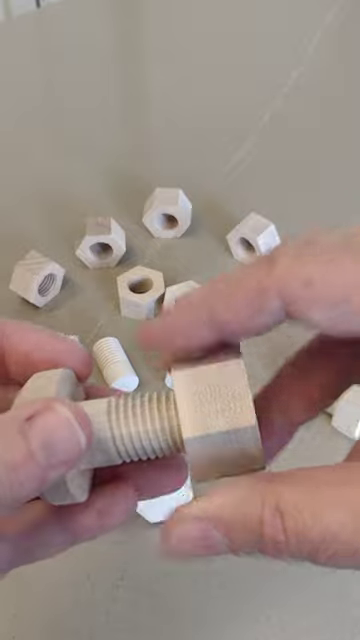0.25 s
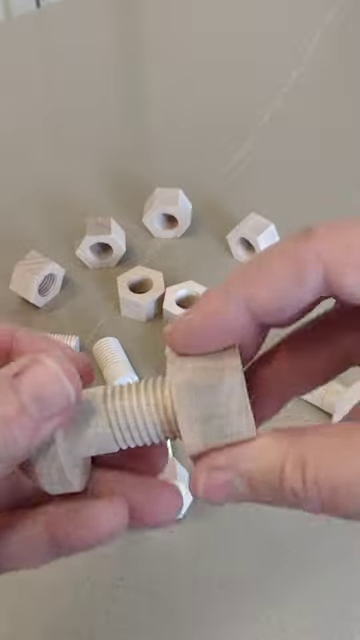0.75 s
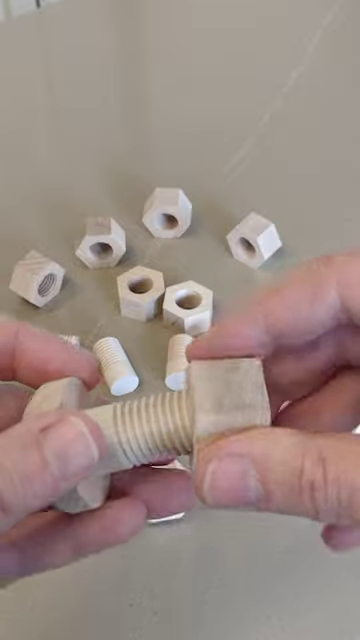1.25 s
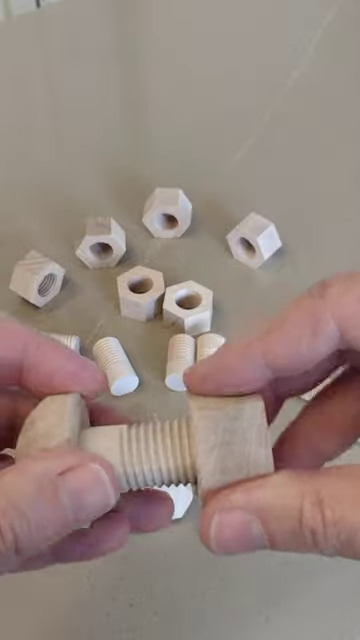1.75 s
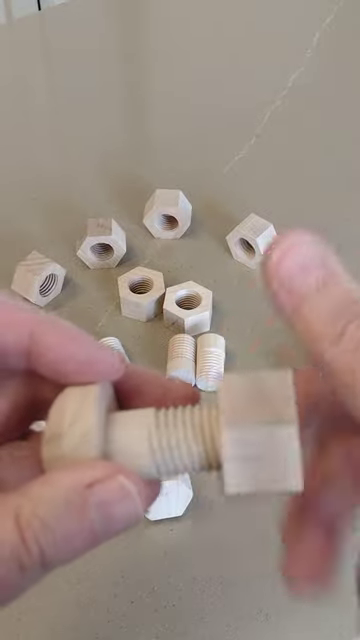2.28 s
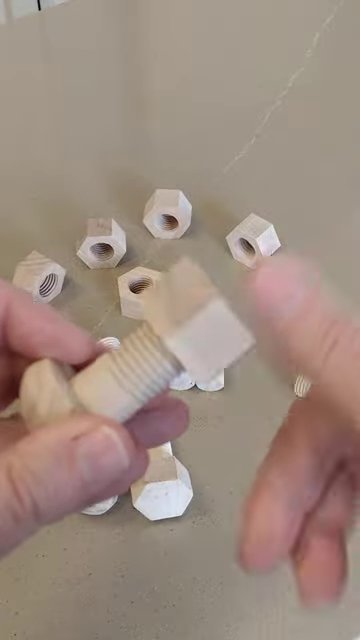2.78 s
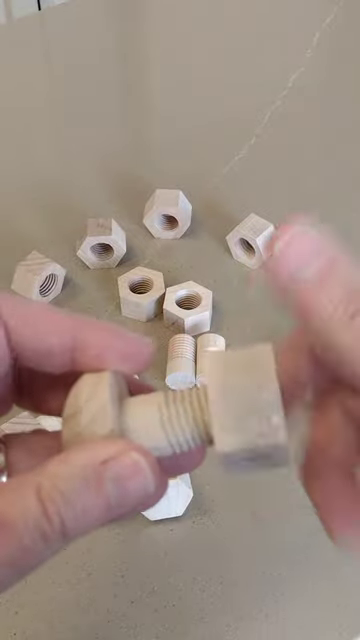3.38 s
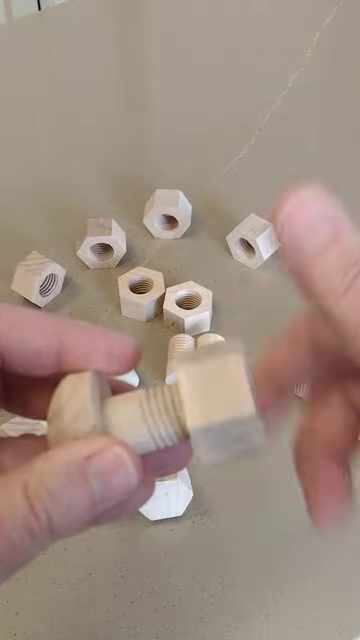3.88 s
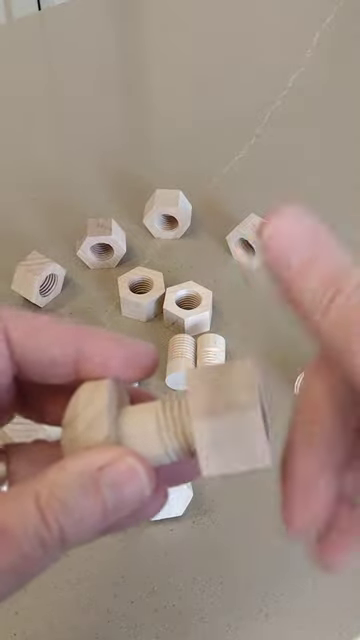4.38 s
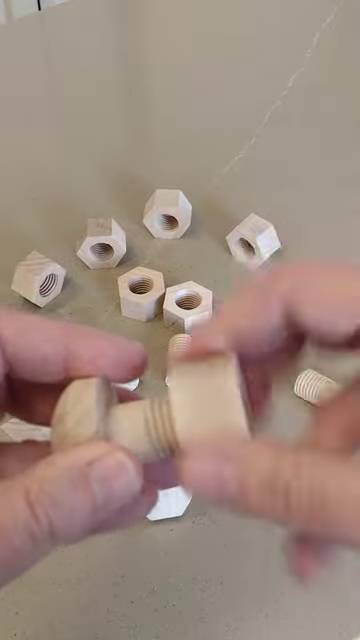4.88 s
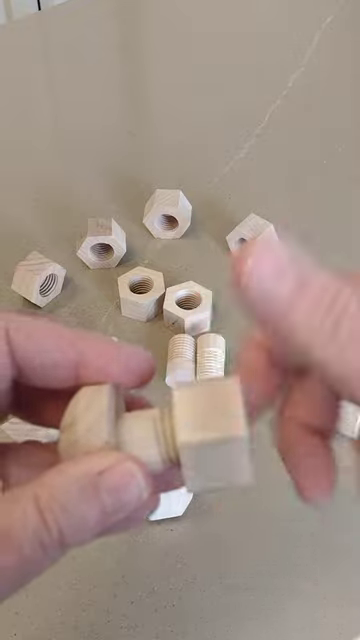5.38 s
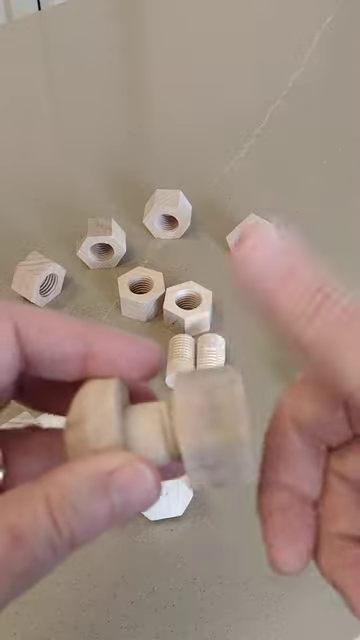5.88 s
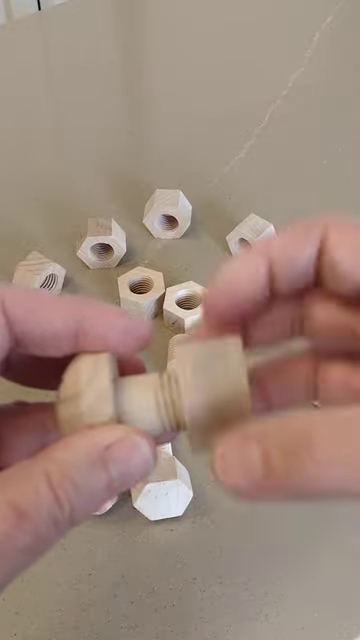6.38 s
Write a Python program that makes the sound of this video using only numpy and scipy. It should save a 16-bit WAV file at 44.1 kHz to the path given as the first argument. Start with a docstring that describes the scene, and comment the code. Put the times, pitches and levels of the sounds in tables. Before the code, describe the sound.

A wooden nut is worked along a wooden bolt close to the microphone, in a hard-walled room with a short echo and a very faint appliance hum. For the first two and a half seconds it turns slowly and quietly: skin brushes the wood, the thread gives tiny squeaks, and light knocks come at about 1 and 1.9 seconds. At 2.6 seconds a brief chirp and a sharp click start a run of flicks, about three a second. Each flick brings a short rub and a quick cluster of dry, bright wooden clicks, with a soft low thud underneath. The thread chirps briefly as it binds near 3.4, 3.6 and 6.4 seconds. The clicks grow stronger, with the hardest near 4.5 seconds and other strong ones around 4.2 and 5. The flicking carries on until the end, at about 6.6 seconds.

```python
"""A wooden nut on a wooden bolt, close by in a hard-walled room where a mains appliance hums faintly.
First the nut is turned slowly: skin brushes it, the thread squeaks, and there is an odd light knock.
From about 2.6 s it is flicked along, some three times a second. The thread rubs, chirps as it binds,
and the loose nut knocks across its play in quick clusters, each knock jolting the holding hand.
The hardest lands near 4.5 s; the flicks carry on to the end."""
import sys
import numpy as np
from scipy import signal
from scipy.fft import rfft, irfft, next_fast_len
from scipy.io import wavfile
from scipy.ndimage import uniform_filter1d, minimum_filter1d

SR = 44100
rng = np.random.default_rng(int(sys.argv[2]) if len(sys.argv) > 2 else 0)


def generate_wav(sig):
    """Save sig (samples, or channels by samples) to the path in sys.argv[1] as 16-bit PCM at SR."""
    pcm = np.round(np.clip(np.atleast_2d(sig).T, -1, 1) * 32767).astype(np.int16)
    wavfile.write(sys.argv[1], SR, pcm)


N = 293265
T = np.arange(N) / SR

# colour of the room tone: freq_hz, gain_db
AIR_COLOUR = [(15, -47.5), (25, -13), (64, -11), (101, -1), (172, -8), (254, -4), (421, -7.5), (576, -12.5),
              (635, -14.5), (934, -11), (1000, -14), (1340, -15.5), (1710, -19), (4270, -20.5), (8000, -28),
              (10400, -74), (17600, -120)]
# partials of the appliance hum: pitch_hz, level_db (rms, before the trim)
HUM_PARTIALS = [(120, -73), (238, -79.5), (273, -76.5), (294, -81), (355, -78), (415, -77.5), (474, -83.5),
                (635, -86)]
# colour of the reverb tail: freq_hz, gain_db
TAIL_COLOUR = [(300, 7), (1200, 6.5), (2500, -1.5), (4000, 2.2), (5500, -1), (8000, 5.5)]
# decay of the reverb tail: freq_hz, t60_s
TAIL_DECAY = [(300, 0.56), (1300, 0.45), (3500, 0.5), (8000, 0.42)]
# colour of skin sliding on wood: freq_hz, gain_db
SKIN_COLOUR = [(600, -7.5), (1300, -12), (2400, -3.5), (3600, 2), (4600, 1.5), (5600, -6), (6800, 1.5),
               (8000, -5)]
# modes of the hand-damped nut and bolt: pitch_hz, width_hz, gain_db
WOOD_MODES = [(1220, 490, -7.5), (1830, 250, -6.5), (2423, 430, 3.5), (3580, 900, 1), (4860, 650, -19),
              (6440, 660, -3.5), (7550, 750, -21.5)]
# narrow modes that ring on faintly: pitch_hz, width_hz, gain_db
RING_MODES = [(1670, 14, 1), (2216, 6.7, -9), (2610, 26, -14), (3300, 11, -12), (3570, 60, -2.5),
              (3940, 12, -9), (4000, 35, -8), (6294, 150, 2)]
# dry squeaks of the turning nut: middle_s, length_s, pitch_hz, level_db
THREAD_SQUEAKS = [(0.095, 0.014, 2120, -71), (0.192, 0.033, 2460, -68), (0.306, 0.037, 3310, -68.5),
                  (0.518, 0.027, 3300, -72), (0.599, 0.018, 2600, -63.5), (2.071, 0.034, 2350, -65),
                  (2.1, 0.024, 2100, -67), (2.258, 0.028, 2330, -64), (2.858, 0.01, 2120, -54),
                  (2.883, 0.014, 2540, -57), (3.418, .014, 2700, -43.5), (4.765, 0.039, 2560, -56),
                  (4.854, 0.19, 1305, -64.5), (5.91, .06, 2318, -67), (6.085, 0.012, 1940, -54)]
# finger strokes, slow turns and then flicks: middle_s, length_s, hiss_db
FINGER_STROKES = [(0.088, 0.025, -73), (0.19, 0.04, -72.5), (.619, 0.064, -69.5), (0.763, 0.14, -72.5),
                  (1.167, 0.12, -72), (1.469, 0.051, -74), (1.722, 0.056, -73), (1.907, 0.047, -72),
                  (2.098, 0.17, -73.5), (2.257, .061, -68), (2.868, 0.067, -59.5), (3.152, 0.087, -62),
                  (3.413, 0.092, -62.5), (3.909, 0.034, -55), (4.175, 0.05, -57.5), (4.483, 0.1, -53),
                  (4.756, 0.062, -55), (5.017, 0.068, -60), (5.314, 0.045, -52.5), (5.706, 0.059, -62.5),
                  (6.122, 0.075, -57), (6.326, 0.02, -59), (6.436, 0.038, -53)]
# stick-slip chirps of the binding thread: start_s, length_s, first_slips_per_s, last_slips_per_s, peak_db
THREAD_CHIRPS = [(2.5689, 0.013, 1160, 1030, -20), (3.375, .02, 1100, 600, -25.5),
                 (3.624, 0.029, 2250, 720, -17), (6.387, 0.018, 1870, 850, -18.5)]
# the nut landing across its play: time_s, peak_db, low_edge_hz, bright_edge_hz, first_rebound_drop_db
NUT_KNOCKS = [(0.9691, -44, 800, 3000, 36), (1.9068, -22.5, 2220, 3240, 29), (2.27, -47.5, 2020, 2360, 10),
              (2.2839, -44.5, 800, 2270, 15), (2.3194, -46.5, 800, 2200, 14),
              (2.6068, -9.5, 2300, 2860, 13.4), (2.844, -40, 2270, 2630, 14), (2.919, -46, 1800, 2400, 13),
              (3.148, -33, 1940, 2400, 5), (3.1651, -17.5, 2600, 2920, 15.5),
              (3.4262, -35, 1460, 2260, 7.8), (3.4689, -37, 1800, 2300, 8.9),
              (3.6082, -35.6, 1840, 2400, 15), (3.6486, -10, 2330, 3964, 3.7),
              (3.6885, -22, 2200, 2790, 14), (3.8671, -35, 2000, 2380, 8.6),
              (3.8761, -21.5, 1900, 2800, 9.3), (3.9225, -9, 2500, 3300, 17),
              (3.9724, -26.5, 1990, 3100, 4.8), (4.1522, -26.5, 1800, 3200, 24),
              (4.1816, -23.5, 2000, 2400, 6), (4.1895, -3, 2800, 3900, 7.6), (4.4289, -34, 2000, 2380, 14),
              (4.4514, -19.5, 2440, 2800, 25), (4.4681, 0, 2500, 5000, 4.3),
              (4.7172, -37.5, 2000, 2600, 14), (4.7783, -27, 2000, 3000, 15), (4.799, -21, 2470, 3500, 14),
              (4.987, -37, 810, 2400, 14), (5.0019, -28.5, 1740, 2800, 5), (5.0216, -24, 2900, 3700, 12),
              (5.029, -5.5, 2315, 4400, 1), (5.2836, -29.5, 800, 3440, 25),
              (5.3255, -11.5, 2690, 3800, 7.7), (5.3665, -27.5, 1390, 3700, 12),
              (5.5758, -46.5, 1590, 5400, 16), (5.6808, -31, 2000, 2700, 12),
              (5.7262, -21.5, 2170, 3200, 4.4), (5.7289, -15, 2660, 3800, 1.9),
              (5.7543, -26.5, 1200, 3600, 6.5), (6.057, -44, 1175, 2100, 6),
              (6.086, -44.5, 1416, 1950, 5.8), (6.1193, -25.5, 800, 3570, 9.1),
              (6.3172, -21.5, 883, 5500, 8), (6.335, -22.5, 1910, 3880, 14), (6.3918, -15, 2400, 3720, 7.6),
              (6.4265, -24.5, 1590, 2340, 11), (6.435, -30, 1600, 3150, 4), (6.4477, -14.5, 1700, 4700, 18),
              (6.4499, -9, 2980, 3300, 3), (6.4826, -25, 2400, 2850, 10), (6.6186, -26, 1270, 3360, 12)]

FIRM_HISS_DB = -54.5   # skin hiss of a firm stroke; thread rub and rattle are scaled from it


def from_db(db):
    """Decibels to gain."""
    return 10 ** (np.asarray(db) / 20)


def unit_rms(x):
    """Scale to an rms of 1."""
    return x / np.sqrt(np.mean(x ** 2) + 1e-20)


def at_hz(curve, hz):
    """Read a curve on a log-frequency axis."""
    freqs, values = np.transpose(curve)
    return np.interp(np.log(np.maximum(hz, 1)), np.log(freqs), values)


def butter(x, hz, kind, order=2):
    """Causal Butterworth filter."""
    return signal.sosfilt(signal.butter(order, hz, kind, fs=SR, output="sos"), x + 1e-18)


def noise(colour):
    """Noise of a given colour, rms 1."""
    size = next_fast_len(N)
    gain = from_db(at_hz(colour, np.fft.rfftfreq(size, 1 / SR)))
    return unit_rms(irfft(rfft(rng.standard_normal(size)) * gain, size)[:N])


def resonate(x, hz, width_hz):
    """One resonance with unit gain at its peak."""
    r = np.exp(-np.pi * width_hz / SR)
    feedback = [1, -2 * r * np.cos(2 * np.pi * hz / SR), r * r]
    return signal.lfilter([(1 - r * r) / 2, 0, (r * r - 1) / 2], feedback, x + 1e-18)


def swell(middle_s, length_s):
    """A smooth rise and fall, length_s wide at half height."""
    return np.cos(np.pi / 2 * np.clip((T - middle_s) / length_s, -1, 1)) ** 2


def grains(per_s, spread_db):
    """A random spray of tiny clicks of uneven size."""
    clicks = (rng.random(N) < per_s / SR) * rng.choice([-1, 1], N)
    return clicks * from_db(spread_db * np.minimum(rng.exponential(1, N), 3))


def background(air_db=-72.5, hum_trim_db=-1, waver=0.045):
    """The bed: room tone and a mains hum whose partials waver slightly in level."""
    hum = 0
    for hz, db in HUM_PARTIALS:
        wander = np.interp(T, np.linspace(0, T[-1], 30), rng.normal(size=30))
        partial = np.sqrt(2) * np.sin(2 * np.pi * (hz * T + rng.random()))
        hum += from_db(db) * (1 + waver * wander) * partial
    return from_db(hum_trim_db) * hum + from_db(air_db) * noise(AIR_COLOUR)


def room(x, tail_db=-8, build_s=0.0011, early_db=-26):
    """Early reflections off the table and near walls, then a diffuse tail of about half a second."""
    t = T[:SR]
    edges_hz = np.geomspace(75, 10000, 16)
    tail = np.zeros(SR)
    for low, high in zip(edges_hz, edges_hz[1:]):
        hz = np.sqrt(low * high)
        decay = from_db(at_hz(TAIL_COLOUR, hz) - 60 * t / at_hz(TAIL_DECAY, hz))
        tail += decay * butter(rng.standard_normal(SR), [low, high], "band", order=3)
    tail *= 1 - np.exp(-(t / build_s) ** 2)
    response = from_db(tail_db) * tail / np.sqrt(2 * np.sum(tail ** 2))
    early_s = rng.uniform(.002, .014, size=4)
    response[(early_s * SR).astype(int)] += from_db(early_db) * rng.choice([-1, 1], size=4)
    return signal.fftconvolve(x, response)[:N]


def after_ring(nut, send_db=-5):
    """The wood's narrow modes ring on faintly after each contact."""
    return from_db(send_db) * sum(from_db(db) * resonate(nut, hz, width) for hz, width, db in RING_MODES)


def wood(force, low_hz, bright_hz, vary_db=0, detune=0, radiate_hz=740):
    """A force rings the wood within the band the contact excites; so small a body radiates no bass."""
    modes = 0
    for hz, width, db in WOOD_MODES:
        gain = from_db(db + vary_db * rng.normal())
        modes += gain * resonate(force, hz * (1 + detune * rng.normal()), width)
    contact = butter(butter(modes, bright_hz, "low", order=4), low_hz, "high", order=3)
    return butter(contact, radiate_hz, "high", order=4)


def taps(force, low_hz, bright_hz):
    """The wood rung so that a unit click peaks at 1."""
    rung = wood(force, low_hz, bright_hz)
    unit_click = wood(signal.unit_impulse(SR // 10), low_hz, bright_hz)
    return rung / np.abs(unit_click).max()


def squeaks(width_hz=310):
    """Light friction: a spray of slips briefly rings one narrow band."""
    slips = grains(per_s=1200, spread_db=1)
    out = np.zeros(N)
    for middle_s, length_s, hz, db in THREAD_SQUEAKS:
        band = resonate(resonate(slips, hz, width_hz), hz, width_hz)
        out += from_db(db) * swell(middle_s, length_s) * unit_rms(band)
    return out


def rubbing(firm_rub_db=-52.5, rub_slope=1.28, skin_grit=0.45):
    """Skin hisses unevenly on the nut; fibres catch in the thread, a rub that grows faster with pressure."""
    hiss_level, rub_level = np.zeros(N), np.zeros(N)
    for middle_s, length_s, hiss_db in FINGER_STROKES:
        stroke = swell(middle_s, length_s)
        hiss_level += from_db(hiss_db) * stroke
        rub_level += from_db(firm_rub_db + rub_slope * (hiss_db - FIRM_HISS_DB)) * stroke
    flutter = unit_rms(butter(rng.standard_normal(N), 120, "low"))
    hiss = unit_rms(np.exp(skin_grit * flutter)) * noise(SKIN_COLOUR)
    rub = unit_rms(wood(grains(per_s=900, spread_db=-3.5), low_hz=1500, bright_hz=2600))
    return hiss_level * hiss + rub_level * rub


def rattle(firm_tick_db=-36, tick_slope=2.3):
    """During each stroke the loose nut ticks against the thread, much harder under a firmer finger."""
    push = sum(from_db(firm_tick_db + tick_slope * (hiss_db - FIRM_HISS_DB)) * swell(middle_s, length_s)
               for middle_s, length_s, hiss_db in FINGER_STROKES)
    return taps(push * grains(per_s=60, spread_db=2), low_hz=1700, bright_hz=2500)


def chirps(low_hz=1850, bright_hz=3600, soft_hz=2400, jitter=0.057, hard_db=-24, skew=2.22):
    """As the thread binds, slips come slower, harder and brighter, until it lets go."""
    force = np.zeros(N)
    for start_s, length_s, first_rate, last_rate, db in THREAD_CHIRPS:
        progress = 0
        for chance in rng.normal(size=80):
            if progress < 1:
                grip = np.sin(np.pi * progress ** skew)   # builds slowly, lets go fast
                force[int((start_s + progress * length_s) * SR)] += from_db(db) * grip
                slips_per_s = first_rate * (last_rate / first_rate) ** progress
                progress += np.exp(jitter * chance) / (length_s * slips_per_s)
    hardness = force / (force + from_db(hard_db))
    return taps(force * hardness, low_hz, bright_hz) + taps(force * (1 - hardness), low_hz, soft_hz)


def jolts(gain_db, slope):
    """One click per knock, growing by slope dB for each dB of the knock."""
    force = np.zeros(N)
    for time_s, db, *_ in NUT_KNOCKS:
        force[int(time_s * SR)] += from_db(slope * db + gain_db)
    return force


def hand_thuds(band_hz=(70, 380)):
    """Each knock jolts the holding hand; flesh gives, so the low thud grows less than the knock."""
    return butter(jolts(gain_db=-17, slope=0.48), band_hz, "band")


def bolt_body(pitch_hz=853, width_hz=350):
    """The bolt's low, hollow note under each knock."""
    return resonate(resonate(jolts(gain_db=-6, slope=0.9), pitch_hz, width_hz), pitch_hz, width_hz)


def contacts(rebounds=3, gap_s=0.0019, scatter=0.3, loss_db=2.5):
    """Each knock is a landing followed by quick, uneven, fading rebounds."""
    all_gaps_s = gap_s * np.exp(scatter * rng.normal(size=(len(NUT_KNOCKS), rebounds)))
    for (time_s, db, low_hz, bright_hz, drop_db), gaps_s in zip(NUT_KNOCKS, all_gaps_s):
        yield time_s, db, low_hz, bright_hz
        for k, delay_s in enumerate(np.cumsum(gaps_s)):
            yield time_s + delay_s, db - drop_db - k * loss_db, low_hz, bright_hz


def knocks(scuff_db=-24, scuff_s=0.0013):
    """The nut scuffs along the thread and lands, at another spot each time, so its modes vary."""
    size = 1400   # samples per contact, with the landing in the middle
    before_s = (size // 2 - np.arange(size)) / SR
    scuff = from_db(scuff_db) * np.exp(-np.abs(before_s) / scuff_s) * (before_s > 0)
    out = np.zeros(N + size)
    for time_s, db, low_hz, bright_hz in contacts():
        force = signal.unit_impulse(size, "mid") + scuff * rng.standard_normal(size)
        knock = wood(force, low_hz, bright_hz, vary_db=4.0, detune=0.052)
        envelope = np.abs(signal.hilbert(knock))
        start = int(time_s * SR) - np.argmax(envelope)   # the peak lands on the cue
        out[start:start + size] += from_db(db) * knock / envelope.max()
    return out[:N]


def scene(thud_send_db=12):
    """Mono mix: the nut up front, its ring and reverb behind, the squeaks dry, all over the bed."""
    nut = knocks() + bolt_body() + chirps() + rubbing() + rattle()
    thuds = hand_thuds()
    reverb = room(nut + from_db(thud_send_db) * thuds)
    return (nut + thuds + after_ring(nut) + reverb + squeaks() + background())[None]


def record(dry, ceiling=0.8, window_samples=131, low_cut_hz=36, high_cut_hz=8150):
    """Master chain: a fast limiter holds the hardest peak, then a low cut and a steep high cut."""
    allowed = ceiling / np.maximum(np.abs(dry), ceiling)
    gain = uniform_filter1d(minimum_filter1d(allowed, window_samples), window_samples)
    high_cut = signal.ellip(10, .2, 70, high_cut_hz, fs=SR, output="sos")
    return signal.sosfilt(high_cut, butter(dry * gain, low_cut_hz, "high"))


dry = scene()
out = record(dry)
generate_wav(out)
```